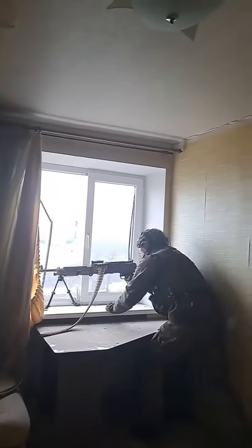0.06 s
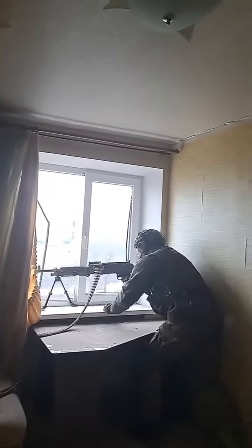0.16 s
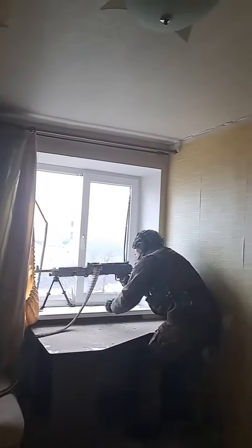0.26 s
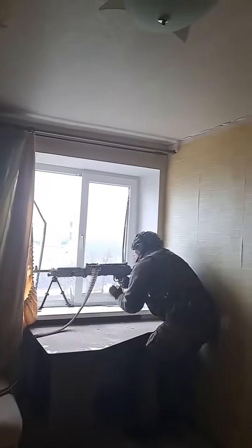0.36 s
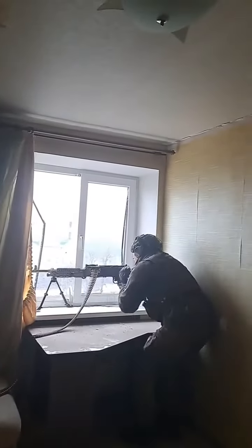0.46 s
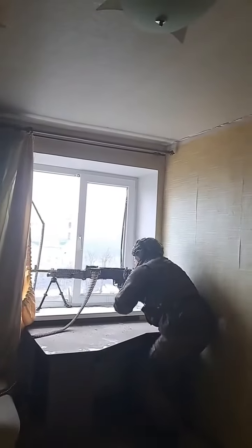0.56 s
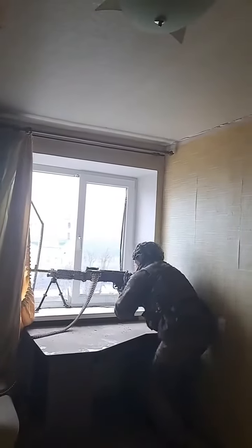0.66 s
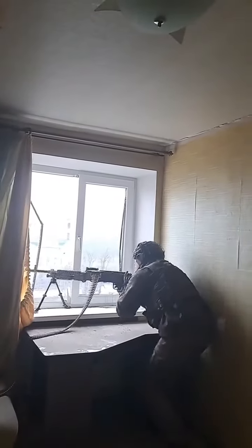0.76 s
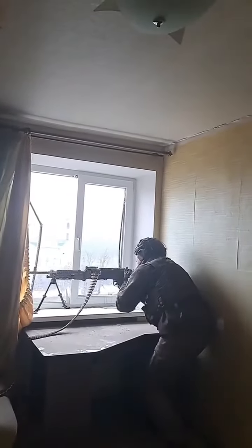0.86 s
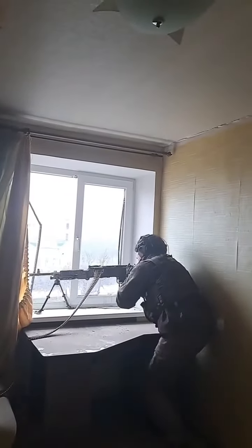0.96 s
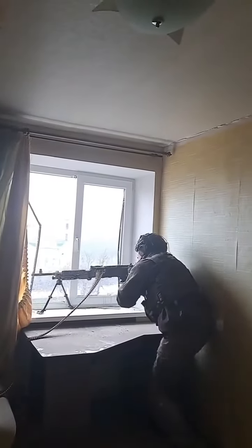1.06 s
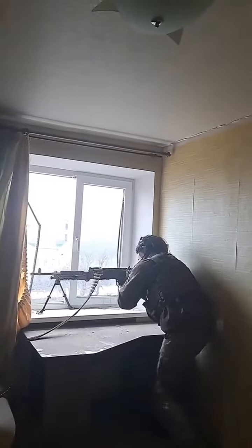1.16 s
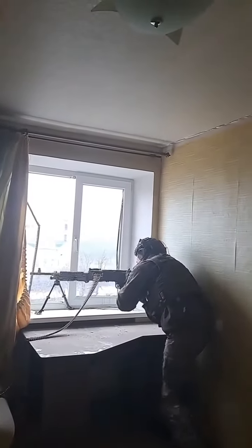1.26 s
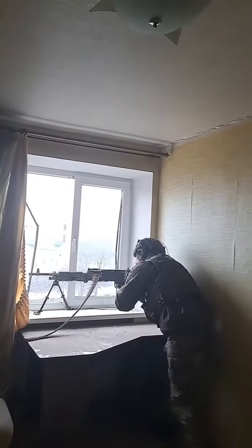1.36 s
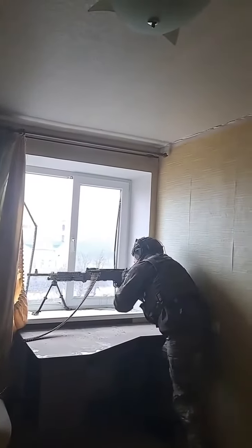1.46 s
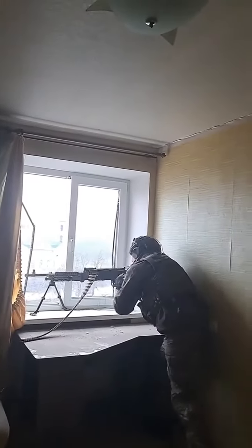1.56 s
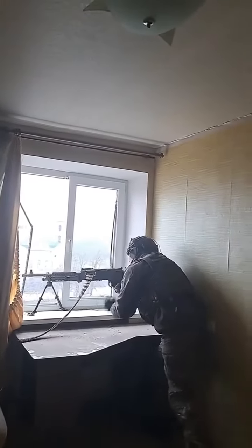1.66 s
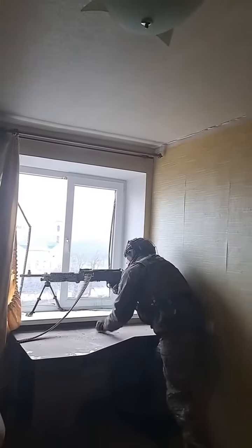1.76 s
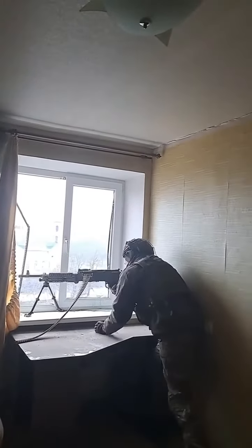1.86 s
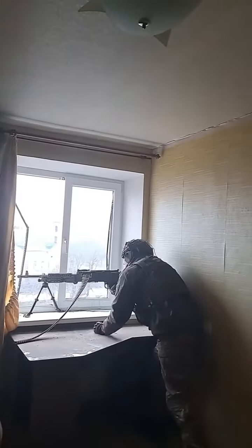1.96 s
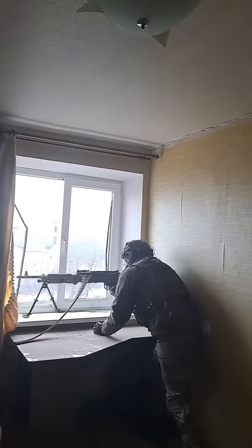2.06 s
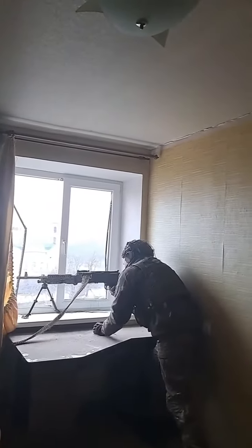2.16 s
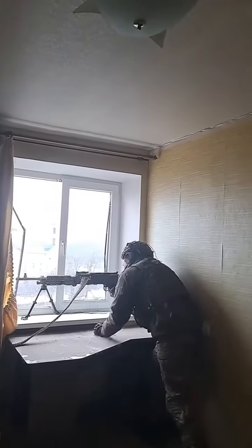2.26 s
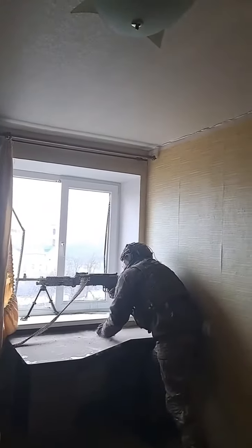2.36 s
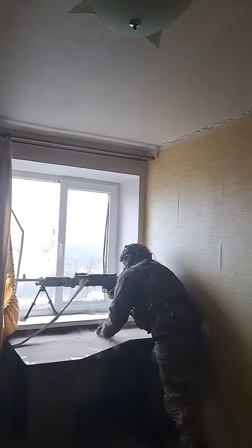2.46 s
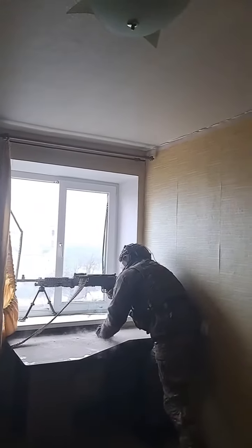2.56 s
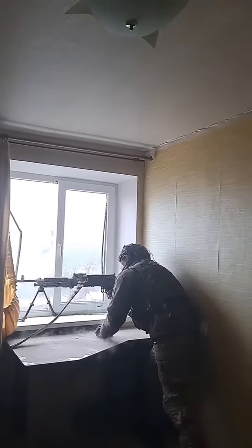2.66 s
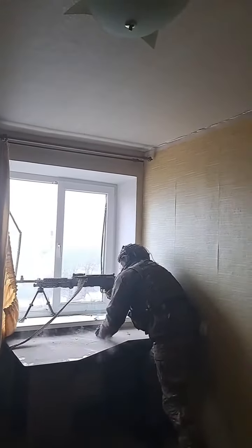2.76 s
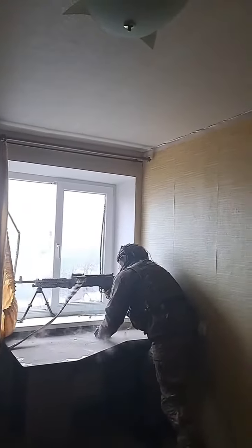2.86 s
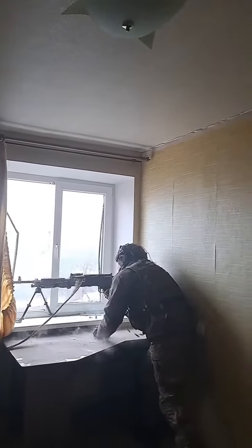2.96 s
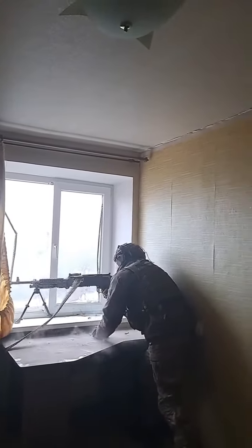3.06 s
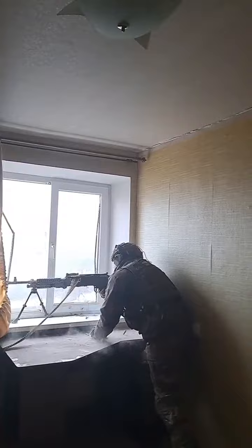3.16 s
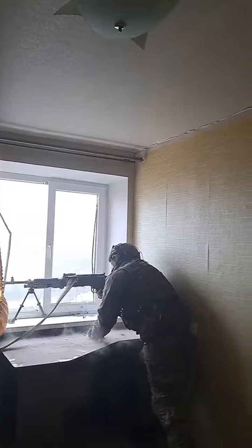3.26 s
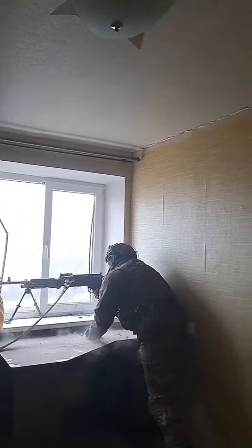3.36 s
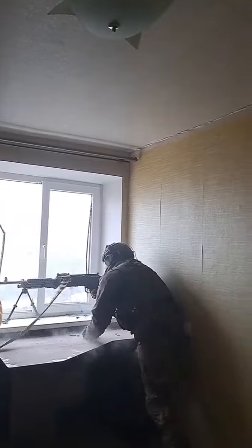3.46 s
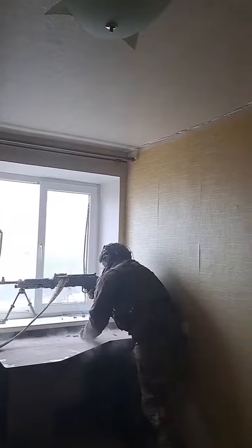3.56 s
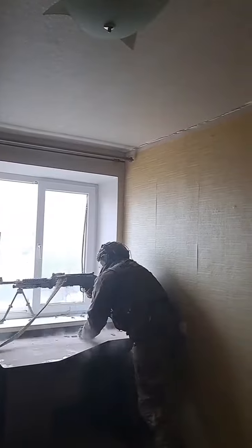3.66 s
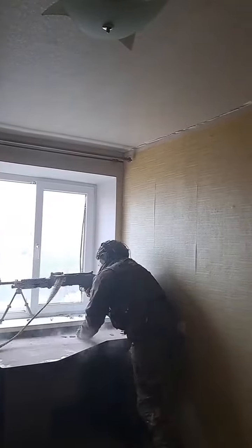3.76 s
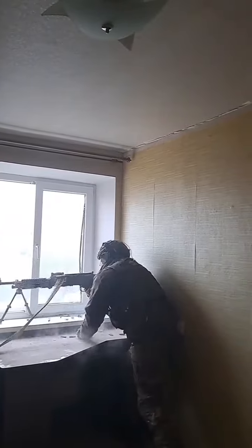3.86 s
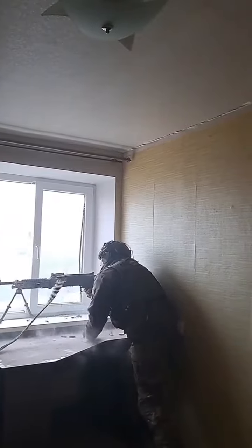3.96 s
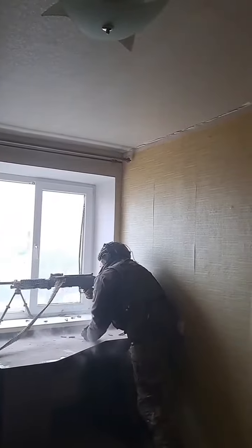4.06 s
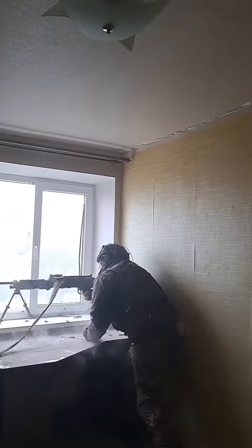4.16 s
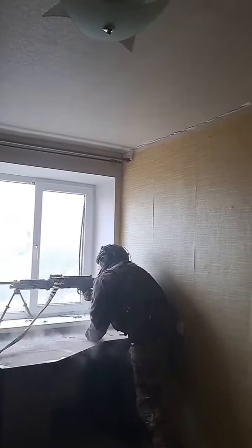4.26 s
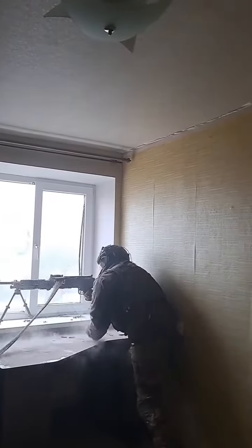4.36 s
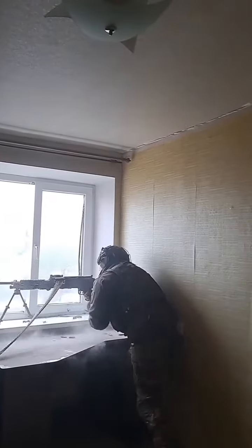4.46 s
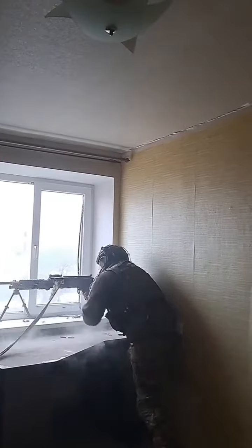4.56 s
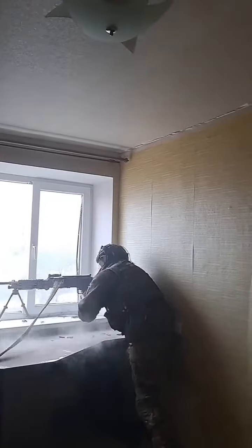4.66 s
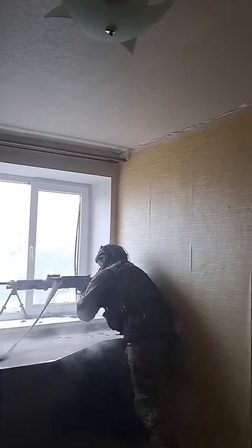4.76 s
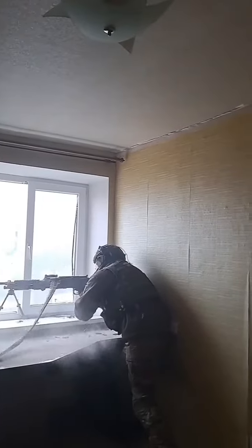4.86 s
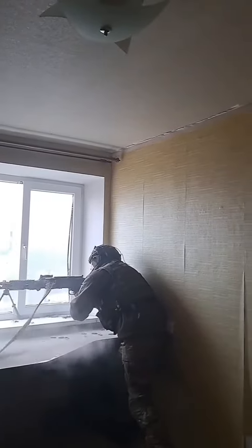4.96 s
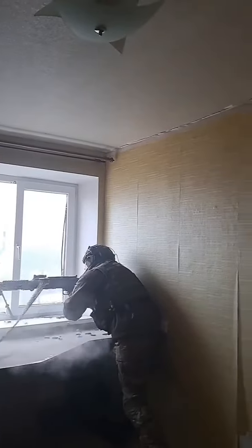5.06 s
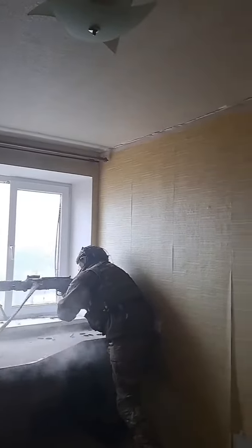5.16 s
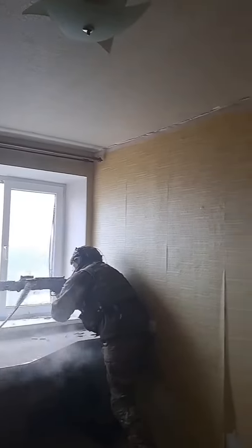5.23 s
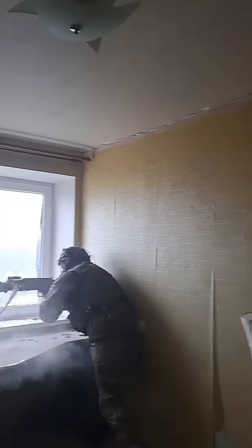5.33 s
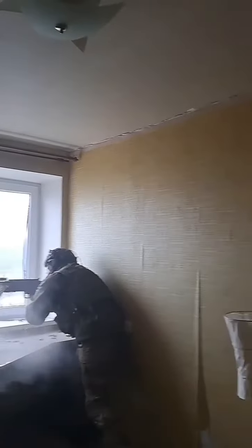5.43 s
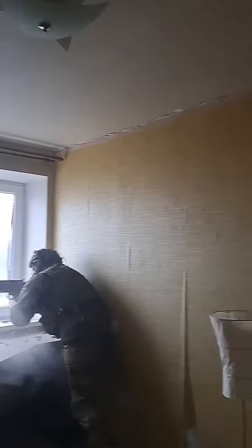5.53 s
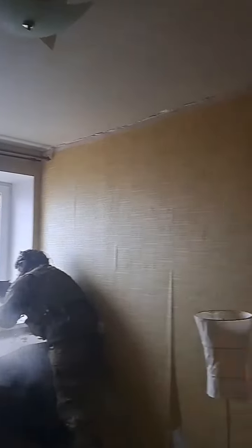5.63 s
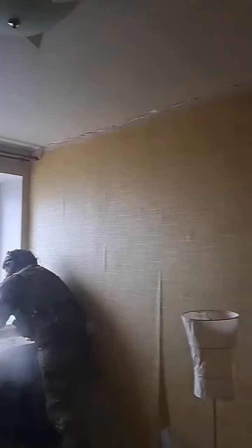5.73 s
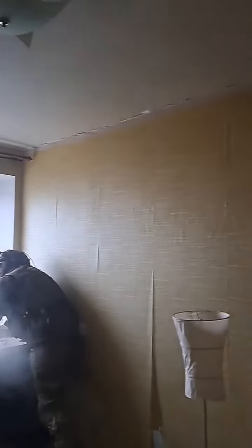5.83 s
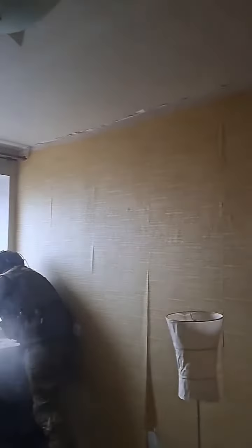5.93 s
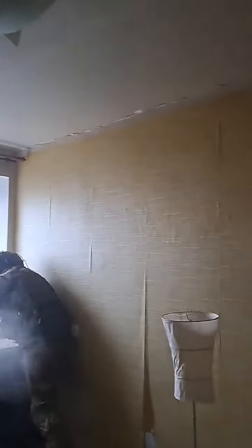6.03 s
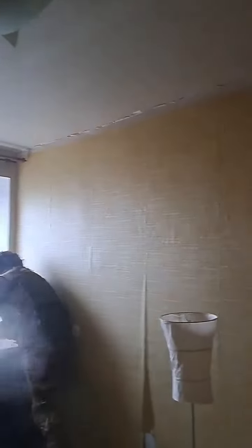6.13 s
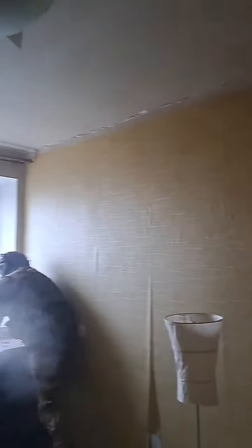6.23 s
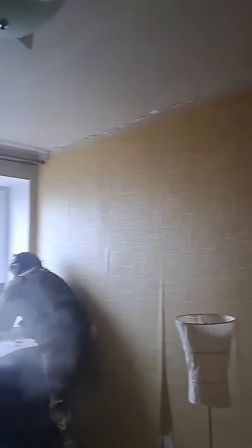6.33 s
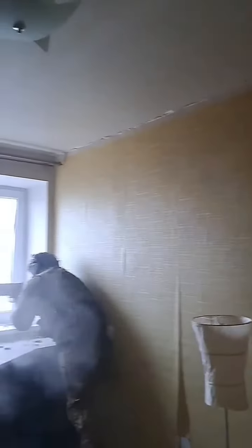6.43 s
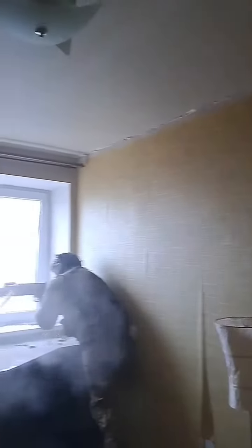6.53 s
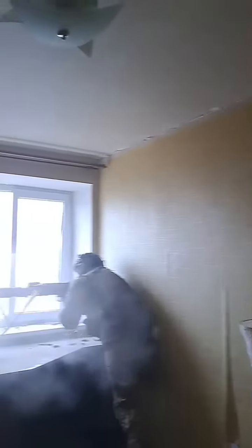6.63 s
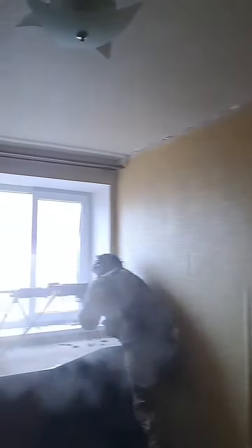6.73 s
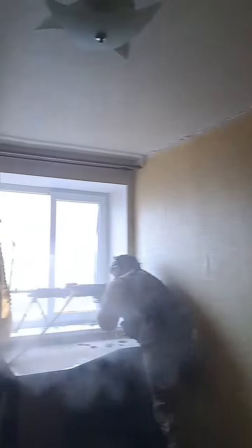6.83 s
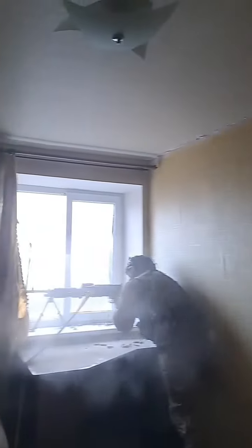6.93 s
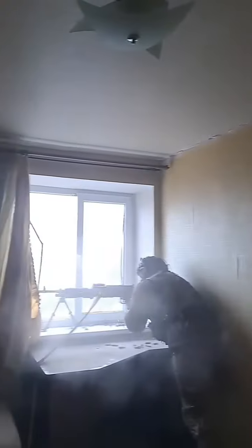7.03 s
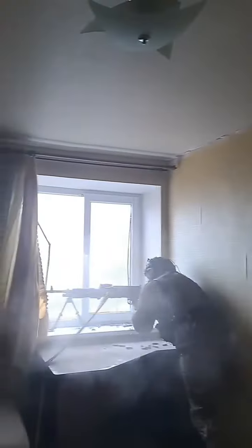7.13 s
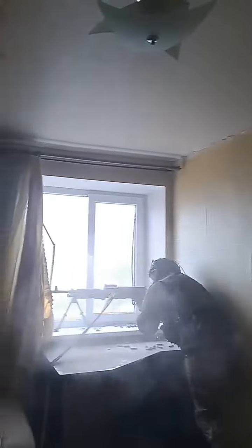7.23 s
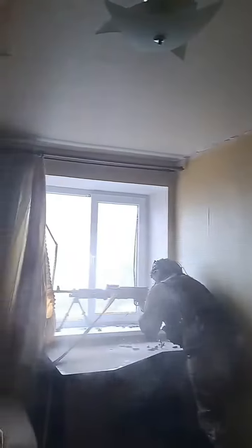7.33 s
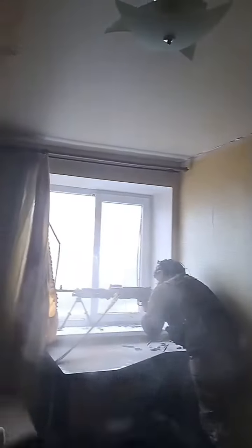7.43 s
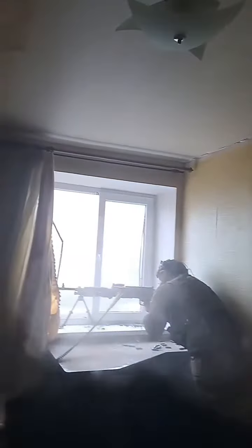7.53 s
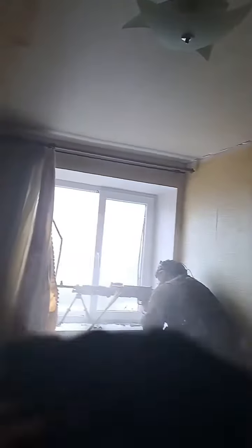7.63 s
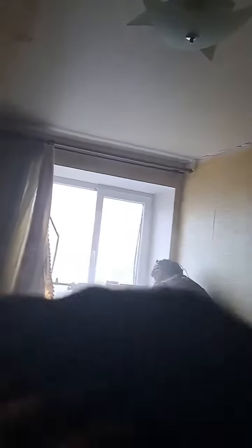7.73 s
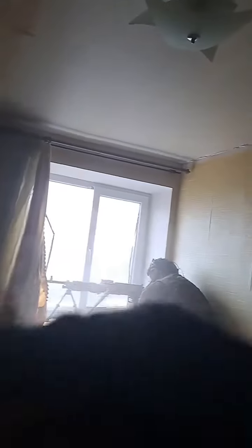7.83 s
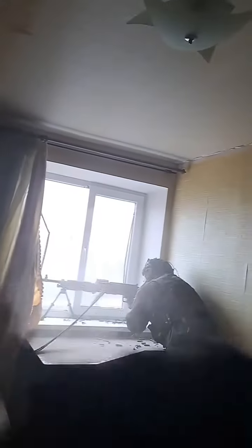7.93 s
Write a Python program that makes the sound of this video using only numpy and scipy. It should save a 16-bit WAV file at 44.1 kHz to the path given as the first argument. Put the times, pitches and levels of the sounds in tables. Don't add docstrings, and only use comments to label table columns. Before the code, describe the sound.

From 0 to 2.1 s, quiet but close movement in a small bare room: low floorboard rumble, boot scuffs, cloth rustle and gear dragging on a wooden sill. The busiest cluster is at 0.4-0.65 s, with a sharp heel knock, deep thump and short woody judders; more knocks come around 0.93-1.03 and 1.3 s, a clear link tick at 1.28 s, then near-calm until a heavy 53 Hz floor thud at 1.87 s. At 2.13 s a loud tick and brief steel rasp, then the first blast at 2.18 s, clamped by the phone's gain control. Continuous machine-gun fire follows to the end near 8 s, roughly 9.5 rounds per second with slight rhythm hitches. Each report is a boxy midrange boom with a crack, ringing wall echoes and fresh hiss, tails merging into a flattened, saturated stereo roar with patchy, dropping-out treble, slightly duller around 4.5 s.

```python
import sys
import numpy as np
from scipy import signal
from scipy.fft import rfft, irfft
from scipy.io import wavfile
from scipy.ndimage import uniform_filter1d

SR = 44100
rng = np.random.default_rng(int(sys.argv[2]) if len(sys.argv) > 2 else 0)


def inscribe(sig):
    pcm = np.round(np.clip(np.atleast_2d(sig).T, -1, 1) * 32767)
    wavfile.write(sys.argv[1], SR, pcm.astype(np.int16))


def voltage_ratio(decibels):
    exponent = np.asarray(decibels, float) / 20
    return 10 ** exponent


N = 352359


def unit(x):
    return x / np.sqrt(np.mean(x ** 2) + 1e-20)


def along(points, hz, order=1):
    rows = np.transpose(points)
    return np.interp(np.log(hz + 1), np.log(rows[0] + 1), rows[order])


def curve(points):
    return np.interp(np.arange(N) / SR, *np.transpose(points))


def sides(db):
    half_db = np.atleast_1d(db) / 2
    return voltage_ratio([half_db, -half_db])


def stereo(z, alike):
    turn = np.arccos(np.clip(alike, -1, 1)) / 2
    mid = z[..., 0, :] * np.cos(turn)
    side = z[..., 1, :] * np.sin(turn)
    return np.stack([mid + side, mid - side], axis=-2)


def rub(spectrum, alike, grain_db, grain_s):
    lumps = unit(uniform_filter1d(rng.standard_normal(N), int(grain_s * SR) + 1))
    z = rfft(rng.standard_normal((2, N)) * voltage_ratio(grain_db * lumps))
    hz = np.fft.rfftfreq(N, 1 / SR)
    return unit(irfft(stereo(z, along(alike, hz)) * voltage_ratio(along(spectrum, hz)), N))


def add(track, s, sound):
    part = track[:, round(s * SR):][:, :sound.shape[1]]
    part += sound[:, :part.shape[1]]


def gestures(s, length_s, db, rise_db_per_s, fall_db_per_s, rest_db):
    t = np.arange(3 * SR)[:, None] / SR
    early_s = np.maximum(s - t, 0)
    late_s = np.maximum(t - s - length_s, 0)
    level_db = db - rise_db_per_s * early_s - fall_db_per_s * late_s
    gain = np.sqrt(voltage_ratio(2 * level_db.max(axis=1)) + voltage_ratio(2 * rest_db))
    return np.pad(gain, (0, N - len(gain)))


# (time [s], boots level [dB], floor boards level [dB])
WEIGHT = [(.05, -37.5, -34), (.125, -32, -46.5), (.19, -33.5, -34), (.26, -35.5, -41), (.35, -34, -50),
          (.42, -28.5, -44), (.465, -23, -10), (.55, -26.5, -22), (.61, -29, -36), (.67, -30, -30),
          (.76, -36.5, -34), (.86, -36.5, -42), (.93, -33.5, -39), (1.01, -31, -27), (1.1, -36, -30),
          (1.16, -41, -32), (1.235, -34, -30), (1.3, -33.5, -36), (1.43, -41, -42), (1.53, -48, -38),
          (1.7, -45, -50), (1.895, -33, -33), (2.0, -35.5, -28), (2.12, -45, -37)]
# (time [s], length [s], drag level [dB], cloth level [dB])
SLIDES = [(0, .01, -40, -42.5), (0.125, 0.022, -35.5, -47.5), (0.235, .04, -40.5, -54.5),
          (0.436, .02, -30, -33), (0.48, 0.055, -30.5, -36), (0.562, 0.056, -29.5, -32),
          (0.66, 0.035, -36, -36.5), (0.865, .01, -40.5, -49), (0.97, 0.048, -39, -46),
          (1.042, 0.13, -34, -38.5), (1.16, 0.12, -33.5, -37), (1.27, .09, -31, -38),
          (1.377, 0.087, -32, -39.5), (1.496, 0.026, -38.5, -50), (1.637, 0.023, -48, -57.5),
          (1.743, .025, -50, -56), (1.885, 0.0091, -53, -61), (1.908, 0.047, -42.5, -52),
          (2.116, 0.05, -35, -69)]
# (frequency [Hz], density [dB per Hz])
BOARDS = [(12, -40), (20, -29), (37, -9.5), (54, 0), (113, -20.5), (125, -13.5), (180, -28), (310, -120)]
BOOTS = [(70, -34), (110, -12), (190, -6.5), (290, -5), (500, -9), (700, -9.5), (900, -15), (1300, -12),
         (1700, -31), (3500, -120)]
DRAG = [(530, -12.5), (900, -9), (1270, -10.5), (1360, -6.5), (1650, -4), (1870, -2.5), (2100, -6.5),
        (3000, -25.5), (3900, -51), (6600, -120)]
CLOTH = [(1350, -37), (2300, 1.5), (2580, -1.5), (3300, -2.5), (4940, -4.5), (5500, -7), (6200, -12.5),
         (6800, -10.5), (7400, -19), (8830, -24), (11100, -19.5), (12000, -25), (12500, -47), (16200, -77),
         (22000, -120)]
# (frequency [Hz], left-right likeness [-1 to 1])
NEAR_ALIKE = [(60, 0.98), (170, 1), (500, 0.89), (1460, 0), (4240, 0), (12300, 0.092)]
BURST_COVERS_S = 2.2


def gunner():
    hold_s, pan_db = 0.0077, -5
    s, boots_db, boards_db = np.transpose(WEIGHT)
    boards = voltage_ratio(1.0) * gestures(s, hold_s, boards_db, 780, 270, -42)
    boards = boards * rub(BOARDS, NEAR_ALIKE, grain_db=3.0, grain_s=0.011)
    boots = voltage_ratio(0.4) * gestures(s, hold_s, boots_db, 430, 71, -44.5)
    boots = boots * rub(BOOTS, NEAR_ALIKE, grain_db=-0.5, grain_s=0.0072)
    s, length_s, drag_db, cloth_db = np.transpose(SLIDES)
    drag = voltage_ratio(2.5) * gestures(s, length_s, drag_db, 340, 130, -50)
    drag = drag * rub(DRAG, NEAR_ALIKE, grain_db=1.0, grain_s=0.004)
    cloth = voltage_ratio(3.0) * gestures(s, length_s, cloth_db, 250, 150, -61.5)
    cloth = cloth * rub(CLOTH, NEAR_ALIKE, grain_db=0.5, grain_s=0.0038)
    audible = np.arange(N) / SR < BURST_COVERS_S
    return (boards + (boots + drag + cloth) * sides(pan_db)) * audible


# (frequency [Hz], width [Hz], level [dB])
SILL = [(258, 76, 0), (496, 140, -1), (880, 170, -0.5), (1700, 420, -12.5)]
# (time [s], knock peak [dB], floor thud [dB], left minus right [dB])
STEPS = [(0.129, -12, -12, -4), (0.445, -13, -12, -5), (0.463, 0, -19, -11), (0.549, -21, -6, -6),
         (0.619, -6, -8, -3), (0.931, -9, -20, -5), (0.998, -15, -7, -7), (1.029, -17, -16, -4),
         (1.309, -10, -19, 2), (1.688, -29.5, -20, 5), (1.873, -18, 9.5, -4), (1.929, -15, -7, -5)]


def knocks():
    out, t = np.zeros((2, N)), np.arange(SR // 5) / SR
    hz = np.fft.rfftfreq(len(t), 1 / SR)
    wood = 0
    for k, (centre_hz, width_hz, db) in enumerate(SILL):
        damping = 1j * hz * width_hz
        wood = wood + (-1) ** k * voltage_ratio(db) * damping / (centre_hz ** 2 - hz ** 2 + damping)
    blow_shape = voltage_ratio(-60 * t / 0.17) * (1 - np.exp(-t / 0.0013))
    for s, db, thud_db, pan_db in STEPS:
        thud = np.sin(2 * np.pi * 53 * t) * voltage_ratio(thud_db - 60 * t / 0.27) * (1 - np.exp(-t / 0.004))
        shared, extra = rng.standard_normal((2, len(t)))
        blow = np.array([shared, 0.7 * shared + 0.7 * extra])
        knock = irfft(rfft(blow * blow_shape) * wood, len(t))
        add(out, s, voltage_ratio(db - 1.0) * knock * sides(pan_db))
        add(out, s + 0.017, voltage_ratio(db - 5.5) * np.array([thud, thud]))
    return out


# (time [s], peak [dB], left minus right [dB])
TICKS = [
    (1.282, -25, 10),
    (1.6357, -46, 12),
    (1.7389, -35, 10),
    (1.875, -47, 0),
    (2.13, -14, 3),
]


def ticks():
    out, t = np.zeros((2, N)), np.arange(SR // 5) / SR
    for s, db, pan_db in TICKS:
        noise = np.diff(rng.standard_normal((2, len(t) + 1)))
        add(out, s, voltage_ratio(db - 14 - 60 * t / 0.18) * noise * sides(pan_db))
    return out


# (time [s], length [s], pitch [Hz], level [dB])
JUDDERS = [(.136, .012, 785, -28), (.14, 0.018, 283, -30), (.35, 0.014, 400, -40), (.417, .03, 1642, -26),
           (.427, .012, 2010, -25), (.463, 0.017, 1790, -23), (.467, .025, 813, -23),
           (.475, 0.034, 280, -23), (.49, .05, 180, -24.5), (.513, 0.025, 2050, -27),
           (.54, .04, 276, -25.5), (.56, .022, 1870, -21.5), (.61, 0.029, 862, -25), (.61, 0.014, 514, -24),
           (.876, .015, 487, -33), (.933, 0.013, 517, -29), (1.0, 0.022, 518, -27.5), (1.0, .015, 756, -26),
           (1.02, 0.03, 205, -27.5), (1.02, 0.056, 145, -30), (1.105, 0.022, 1750, -28),
           (1.145, 0.015, 1780, -31), (1.21, 0.036, 189, -29.5), (1.225, 0.022, 121, -29),
           (1.27, 0.018, 230, -30), (1.27, 0.027, 150, -29), (1.1, 0.045, 170, -29), (1.311, .03, 880, -26),
           (1.311, 0.021, 1350, -31), (1.35, 0.024, 1900, -32), (1.42, .02, 1840, -26.5),
           (1.695, 0.026, 470, -35), (1.745, .015, 538, -35), (1.874, .015, 791, -30),
           (1.874, .01, 1500, -38), (1.9, .03, 300, -31)]


def judders():
    t60_s, wander_cycles, pan_db = 0.11, 0.082, -2
    out, t = np.zeros((2, N)), np.arange(SR // 5) / SR
    for s, length_s, hz, db in JUDDERS:
        steps = rng.standard_normal((2, len(t)))
        wander = wander_cycles * np.cumsum(steps, axis=1) * np.sqrt(hz / SR)
        shape = voltage_ratio(db - 60 * np.maximum(t - length_s, 0) / t60_s) * (1 - np.exp(-t / 0.002))
        add(out, s, np.sin(2 * np.pi * (hz * t + wander)) * shape * sides(pan_db))
    return out


# (time [s], rasp level [dB])
BOLT = [
    (2.105, -50),
    (2.1145, -42),
    (2.116, -24),
    (2.127, -25),
    (2.132, -17),
    (2.15, -16),
    (2.17, -15),
    (2.178, -22),
    (2.2, -30),
]
# (frequency [Hz], density [dB per Hz])
STEEL = [(180, -52), (300, -22), (854, 1), (1280, -3), (1780, 2), (2180, -8), (2390, -7), (6590, -9.5),
         (9010, -18), (10700, -20), (12500, -8), (16200, -60), (22000, -120)]


def bolt():
    t = np.arange(N) / SR
    running = (t > BOLT[0][0]) & (t < BOLT[-1][0])
    rasp = rub(STEEL, [(1000, 0.17)], grain_db=-0.5, grain_s=0.0013)
    return running * voltage_ratio(curve(BOLT) - 3.0) * sides(-5) * rasp


# (first round time [s], cycle [s])
CADENCE = [(2.2895, .1064), (2.5, .1035), (3.23, .1035), (4.3685, .1047), (4.7907, .1025), (5.2046, .1061),
           (5.5192, .103), (5.7311, .1067), (6.0511, .1106), (6.3796, .1064), (6.9125, .107),
           (7.4536, .1097), (7.671, .1062)]


def firing_times():
    ends = [s for s, _ in CADENCE[1:]] + [N / SR]
    stretches = [np.arange(s, end - cycle_s / 2, cycle_s) for (s, cycle_s), end in zip(CADENCE, ends)]
    return np.concatenate(stretches)


# (frequency [Hz], density [dB per Hz])
CRACK = [(1200, -66), (2500, -23), (4500, -24), (6500, -23), (9000, -37), (11500, -15), (13000, -55)]


def cracks():
    level_db, scatter_db, t60_s, pan_db = -30, 7, 0.07, 2
    gate, t = np.zeros((2, N)), np.arange(SR // 10) / SR
    for s in firing_times():
        peak_db = level_db + scatter_db * rng.standard_normal((2, 1))
        add(gate, s, voltage_ratio(peak_db - 60 * t / t60_s))
    return gate * sides(pan_db) * rub(CRACK, [(1000, 0.058)], grain_db=2.5, grain_s=0.00056)


# (frequency [Hz], density [dB per Hz])
REPORT = [(15, -55), (25, -12.5), (97, -11.5), (136, -10.5), (216, -7.5), (260, -6.5), (472, -6), (928, -5),
          (1480, -7.5), (1920, -6.5), (2770, -12), (4530, -14.5), (8460, -28), (11300, -22), (12500, -29),
          (16200, -79), (22000, -120)]
# (frequency [Hz], half width [Hz], left level [dB], right level [dB])
ROOM_MODES = [(142.6, 6.4, -30, -33.5), (258, 8.3, -34.5, -34.5), (274, 10.4, -33, -33),
              (368.6, 8.4, -36.5, -34.5), (431, 4.6, -30, -35), (522, 14, -41.5, -34.5),
              (668, 14, -36.5, -44), (729, 18, -43, -41), (798, 16, -52, -43), (876, 6.6, -46, -54),
              (939, 6.9, -46.5, -32.5), (1030, 9.3, -32, -43), (1100, 14, -36, -52), (1325, 12, -47, -45.5),
              (1584, 8.5, -55, -51), (1690, 20, -56, -40), (1825, 15, -59, -40), (1994, 23, -54, -45)]
# (frequency [Hz], left build-up [s], right build-up [s], hold [s], t60 [s])
ROOM = [(60, 0.038, 0.02, 0.074, 0.95), (300, 0.04, 0.008, 0.044, 0.51), (790, 0.024, 0.023, 0.05, 0.83),
        (1640, 0.012, 0.002, 0.036, 0.51), (4000, 0.0044, 0.0017, 0.038, 0.66),
        (6430, 0.0015, 0.0019, 0.061, 0.5), (9100, 0.0067, 0.0064, 0.012, 0.39)]
# (frequency [Hz], constant share [0-1], share drifting with the phone [0-1])
REPEAT = [(40, .3, .2), (150, .55, .25), (350, .6, .27), (800, .5, .33), (1800, .27, .45), (3200, .06, .4),
          (6500, 0, .2), (10000, 0, .05)]
# (frequency [Hz], left-right likeness [-1 to 1])
ALIKE = [(60, 0.099), (150, 0.39), (350, 0.76), (860, 0.036), (2090, -0.053), (5070, 0.1), (11300, -0.12),
         (12300, 0.6)]
# (frequency [Hz], left minus right [dB])
LEAN = [(40, 5), (80, 1), (140, -1), (270, -3), (590, -1), (1260, -5), (2690, -4), (5750, -1), (9500, 8),
        (12300, 1.5)]


def room_answers(hiss_db, size=16384):
    hz = np.fft.rfftfreq(size, 1 / SR)
    fixed = rfft(rng.standard_normal((2, size)))
    drift, fresh = rfft(rng.standard_normal((2, len(hiss_db), 2, size)))
    memory = 0.8
    drift[1:] *= np.sqrt(1 - memory ** 2)
    drift = signal.lfilter([1], [1, -memory], drift, axis=0)
    same, slow = along(REPEAT, hz), along(REPEAT, hz, order=2)
    z = np.sqrt(same) * fixed + np.sqrt(slow) * drift + np.sqrt(1 - same - slow) * fresh

    modes = 0
    for mode_hz, width_hz, left_db, right_db in ROOM_MODES:
        modes = modes + voltage_ratio([[left_db + 29.5], [right_db + 29.5]]) / (1 + ((hz - mode_hz) / width_hz) ** 2)
    colour = (voltage_ratio(along(REPORT, hz)) + modes) * sides(along(LEAN, hz))
    late_right = np.exp(-2j * np.pi * hz * np.array([[0], [0.0002]]))
    noise = irfft(stereo(z, along(ALIKE, hz)) * colour * late_right, size)

    f, t, spec = signal.stft(noise, SR, nperseg=128)
    build_s = np.array([along(ROOM, f), along(ROOM, f, order=2)])[..., None] + 1e-4
    hold_s, t60_s = along(ROOM, f, order=3)[:, None], along(ROOM, f, order=4)[:, None]
    onset_s = 0.002
    shape = (1 - np.exp(-(t + onset_s) / build_s)) * voltage_ratio(-60 * np.maximum(t - hold_s, 0) / t60_s)
    treble = along([(1500, 0.5), (3500, 1.0)], f)[:, None]
    bright = voltage_ratio(hiss_db[:, None, None, None] * treble)
    return unit(signal.istft(spec * shape * bright, SR, nperseg=128)[1][..., :size])


# (delay [s], pitch [Hz], t60 [s], left level [dB], right level [dB])
ECHOES = [(.0005, 570, 0.014, -4, 1), (.005, 1050, 0.033, -22, -0.5), (0.0173, 350, 0.02, 0.5, -1),
          (.0185, 590, 0.0095, -9.5, -9), (.023, 452, 0.015, -14, 7), (.035, 669, 0.056, -7, -3.5),
          (0.04, 1330, 0.0098, -30, 0), (.044, 400, 0.01, 6.5, -5), (.047, 880, 0.013, -4.5, -34),
          (0.0535, 437, 0.019, 1.5, -4), (.058, 787, .018, -2.5, -24), (.064, 382, 0.019, -0.5, -9.5),
          (.067, 946, 0.032, -8, -0.5), (.083, 318, 0.011, 0, -6), (.085, 654, 0.015, 0, 2),
          (.098, 300, 0.026, -5.5, -8)]


def reflections(detune):
    t = np.arange(SR // 16) / SR
    out = np.zeros((2, SR // 5))
    for delay_s, hz, t60_s, left_db, right_db in ECHOES:
        ring = np.sin(2 * np.pi * hz * detune * t) * voltage_ratio(-60 * t / t60_s) * (1 - np.exp(-t / 0.00095))
        add(out, delay_s, ring * voltage_ratio([[left_db], [right_db]]))
    return out


# (time [s], charge [dB], hiss [dB])
FIRST_SHOT = (2.182, -0.38, -0.25)
# (time [s], report level [dB])
CHARGE_DRIFT = [
    (2.3, 0.5),
    (3.2, 1),
    (4.5, -1),
    (5.8, 0),
    (6.2, 0.6),
    (6.8, .6),
    (7.6, -0.9),
]


def gun():
    charge_scatter_db, hiss_db, hiss_per_charge = 0.67, -0.2, -0.36
    out = np.zeros((2, N))
    times = firing_times()
    scatter = rng.standard_normal((len(times) + 1, 2))
    charge_db = np.interp(times, *np.transpose(CHARGE_DRIFT)) + charge_scatter_db * scatter[1:, 1]
    later = np.transpose([times, charge_db, hiss_db + hiss_per_charge * charge_db])
    rounds = np.vstack([FIRST_SHOT, later])
    tails = room_answers(rounds[:, 2])
    for (s, db, _), tail, (tune, size) in zip(rounds, tails, scatter):
        add(out, s, voltage_ratio(db - 14.0) * tail)
        add(out, s, voltage_ratio(db - 2.5 + 2.34 * size) * reflections(detune=1 + 0.0037 * tune))
    u = np.arange(300) / SR / 0.00036
    blast = (1 - u) * np.exp(-u) * (1 - np.exp(-u / 0.25))
    add(out, FIRST_SHOT[0] + 0.00152, blast * voltage_ratio([[3.5], [8]]))
    return out


def scene():
    return gunner() + knocks() + ticks() + judders() + bolt() + cracks() + gun()


def levelled(x, ceiling_db, window_s, ratio):
    width = int(window_s * SR)
    power = uniform_filter1d(np.mean(x ** 2, axis=0), width, origin=width // 3)
    over = np.maximum(np.sqrt(np.abs(power)) / voltage_ratio(ceiling_db), 1)
    return x * uniform_filter1d(over ** (1 / ratio - 1), width // 2)


# (time [s], extra threshold [dB])
STARVED = [
    (2.2, -6),
    (2.215, 1),
    (2.24, 2.5),
    (3.3, 3),
    (3.7, -0.5),
    (5.8, 0.5),
    (6.1, 3),
    (6.9, 4),
    (7.2, 0),
    (8, 0.5),
]
# (frequency [Hz], during burst [dB], before burst [dB])
THRESHOLD = [(300, -35, -33), (740, -17, -15), (1320, -9.5, -9), (2180, -14, -11.5), (2900, -4.5, -10),
             (3830, -3, -13), (4880, -6, -19), (5510, -4, -19), (6030, 2, -4), (6550, 2.5, -3),
             (6950, -2, -1), (7330, -1, 4.5), (8130, -9, -7), (9050, -12, -7), (12000, -16, -9)]


def starved(x, patchy_db):
    top_hz = 11740
    pair = np.array([x[0] + x[1], x[0] - x[1]]) / 2
    hz, t, z = signal.stft(pair, SR, nperseg=2048)
    now = uniform_filter1d(np.abs(z) ** 2, size=31, axis=1)
    around = uniform_filter1d(now, size=5, axis=2) / (now + 1e-20)
    band = now * np.clip(around, 0.4, 2.5) ** 1.8

    field = rng.standard_normal(z.shape[1:])
    bands = np.repeat(field, repeats=16, axis=0)[:len(hz)]
    fine = unit(uniform_filter1d(field, size=18, axis=0))
    field = unit(uniform_filter1d(fine + 1.8 * bands, size=2, axis=1))
    burst_db = along(THRESHOLD, hz)[:, None] + np.interp(t, *np.transpose(STARVED))
    calm_db = along(THRESHOLD, hz, order=2)[:, None]
    limit_db = np.where(t > FIRST_SHOT[0], burst_db, calm_db) + patchy_db * field

    jitter = np.repeat(rng.standard_normal(len(t)), 2)[:len(t)]
    edge_hz = top_hz + 35 * np.clip(jitter, -2, 2) ** 3
    kept = (np.abs(z) > np.sqrt(np.abs(band)) * voltage_ratio(limit_db)) & (hz[:, None] < edge_hz)
    mid, side = signal.istft(z * kept, SR, nperseg=2048)[1][:, :N]
    return np.array([mid + side, mid - side])


def low_pass(x):
    return signal.sosfilt(signal.butter(12, 12900, fs=SR, output="sos"), x)


# (time [s], gain [dB])
GRIP = [
    (2.187, 2),
    (2.192, -2),
    (2.215, -4),
    (2.235, 1.5),
]


def record(dry):
    level = levelled(dry, ceiling_db=-17.5, window_s=0.008, ratio=2.33) * voltage_ratio(curve(GRIP))
    squeezed = level / (1 + np.abs(level) ** 3) ** (1 / 3)
    hz = np.fft.rfftfreq(N, 1 / SR)
    limited = irfft(rfft(squeezed) * hz ** 2 / (hz ** 2 + 30 ** 2), N)
    mix = starved(limited, patchy_db=4.5)
    return low_pass(mix)


dry = scene()
out = record(dry)
inscribe(out)
```